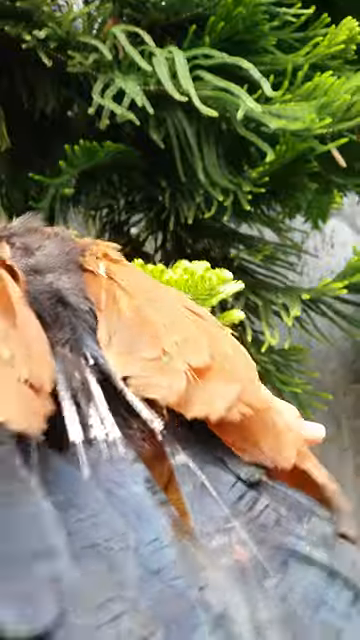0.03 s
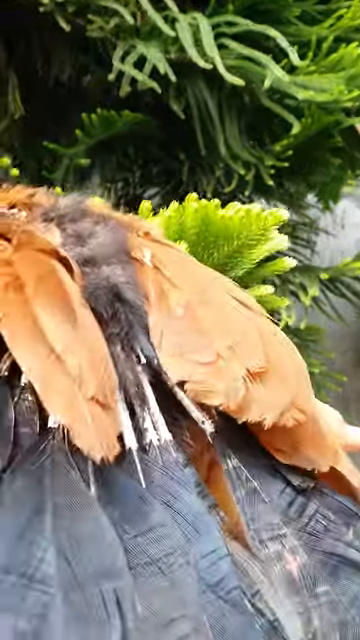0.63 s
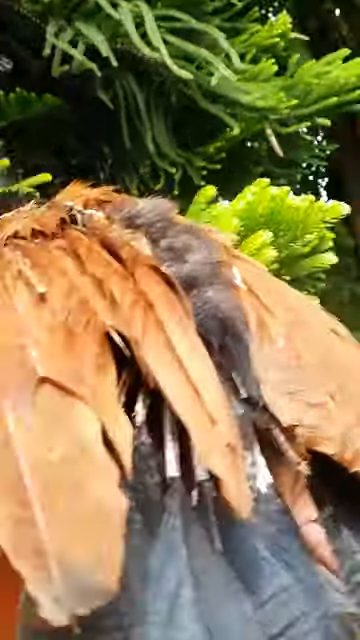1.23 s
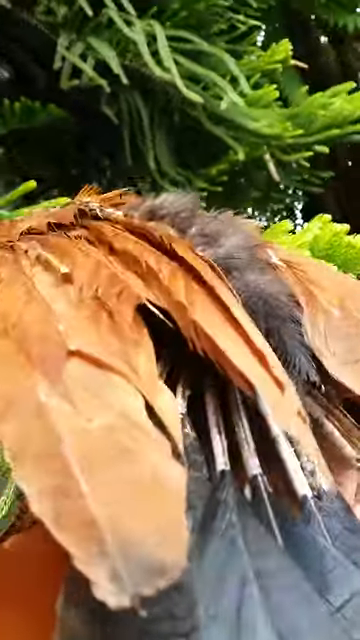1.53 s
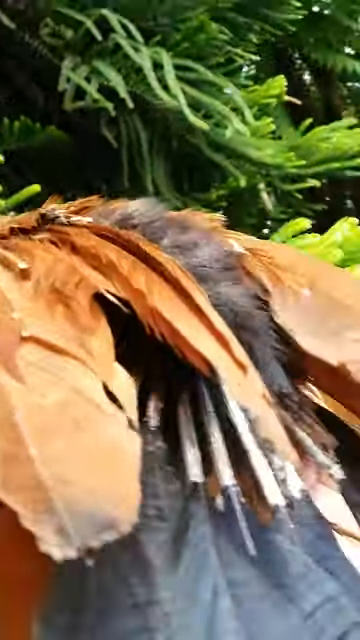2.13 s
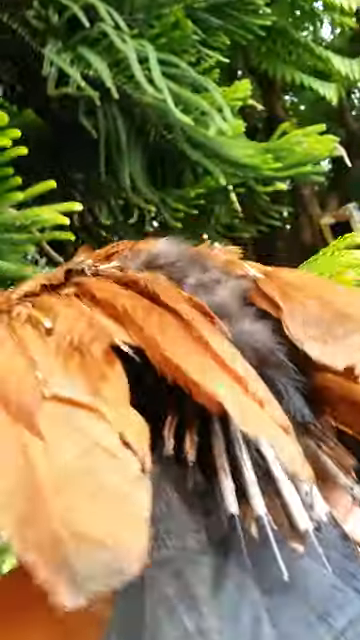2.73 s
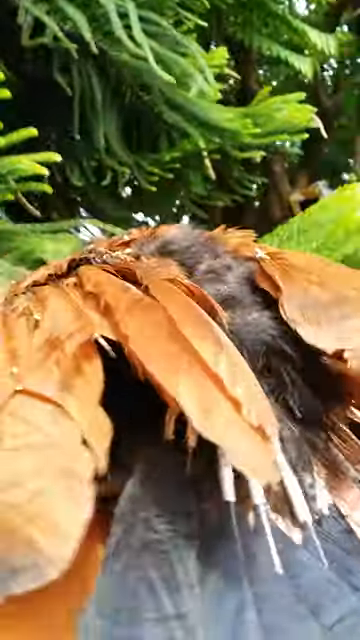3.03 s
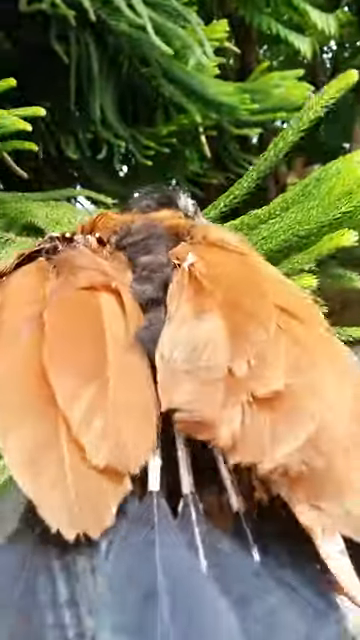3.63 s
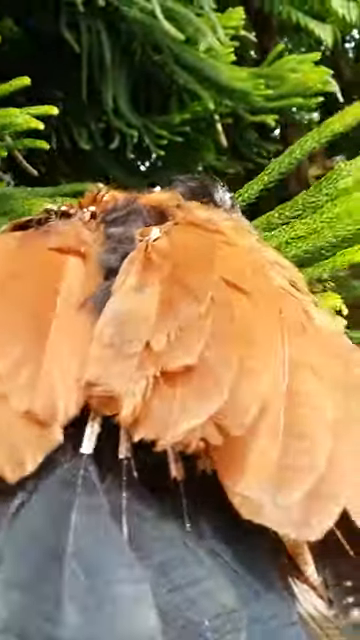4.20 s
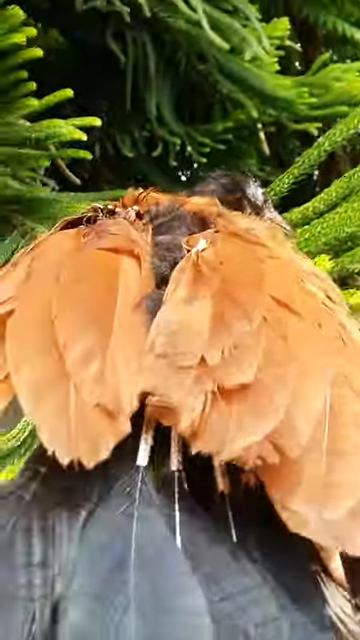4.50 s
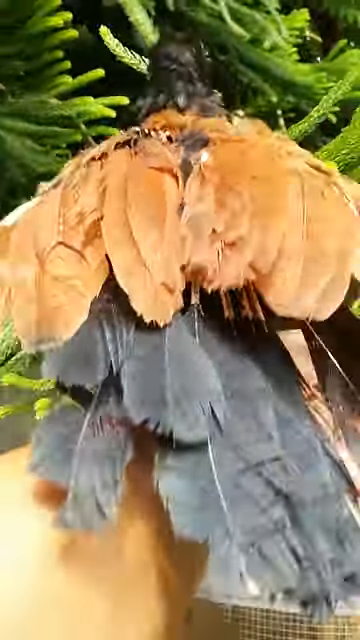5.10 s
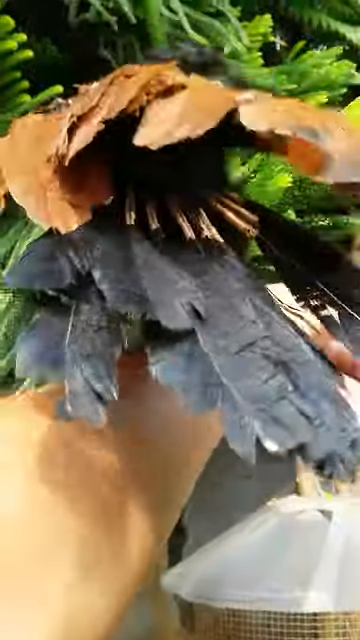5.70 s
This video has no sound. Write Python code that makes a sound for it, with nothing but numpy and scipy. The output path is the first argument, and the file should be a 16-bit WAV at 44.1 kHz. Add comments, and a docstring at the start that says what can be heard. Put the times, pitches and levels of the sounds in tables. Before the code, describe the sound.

Faint feather rustling and distant birds over a low outdoor rumble, until a bird close by squawks twice, loud and raspy.

```python
"""A tame bird handled in a garden.

Friction between its feathers makes a rustle; then it gives two loud, harsh squawks close by. By the
source-filter principle, the two sides of its syrinx pulse at different pitches and break into a rasp
where they collide, and throat and beak shape the spectrum. Small birds call far off over a low
outdoor rumble, and reflections in the yard add a short echo."""
import sys
import numpy as np
from scipy import signal
from scipy.fft import rfft, irfft
from scipy.io import wavfile
from scipy.ndimage import uniform_filter1d, minimum_filter1d

SR = 44100
rng = np.random.default_rng(int(sys.argv[2]) if len(sys.argv) > 2 else 0)


def output_pcm(signal):
    """Save a mono or channel-first signal as 16-bit PCM at the path in sys.argv[1].

    Samples are clipped to [-1, 1] before scaling.
    """
    pcm = np.clip(np.atleast_2d(signal).T, -1, 1) * 32767
    wavfile.write(sys.argv[1], SR, np.round(pcm).astype(np.int16))


N = 253575
T = np.arange(N) / SR

# Spectra of the noises: f/Hz, relative level/dB
RUMBLE_SPECTRUM = [(28, -45), (42, -12.5), (62, -6), (150, -0.5), (200, -6), (320, -9), (500, -16),
                   (750, -21.5), (1600, -24.5), (2150, -25.5), (3500, -42.5), (4800, -39.5), (6000, -49.5),
                   (11000, -47)]
KNOCK_SPECTRUM = [(300, -14), (700, -11), (1100, -3), (1500, -6), (2500, -30), (8000, -42)]
FEATHER_SPECTRUM = [(400, 5.5), (900, 1.5), (1500, 3.5), (2250, 1), (3000, -2), (3800, -9), (4900, 3),
                    (5500, -9), (6300, -19), (8000, -16), (11000, -15.5), (16000, -20)]
WING_SPECTRUM = [(470, -44), (800, -6), (1280, -3), (1460, -2), (2040, 3), (2990, -4.5), (3250, -12),
                 (3530, 0), (3660, -26), (3800, -5), (4880, 5.5), (6200, -20.5), (14000, -32)]
QUILL_SPECTRUM = [(400, 5), (1100, 7.5), (2300, 12), (3500, -8), (5000, 2), (7000, -28), (16000, -41)]
TICK_SPECTRUM = [(3000, -33), (7000, -25.5), (10800, 3), (13000, -24), (16000, -20)]
# Spells of a faint whine: t/s, length/s, level/dB, T60/s
WHINE_SPELLS = [(.5, 1.97, -71.5, 6.5), (3.931, .55, -65, 6)]
# Distant calls: t/s, length/s, start f/Hz, end f/Hz, relative level/dB, warble as a fraction of f
FAR_CALLS = [(0.086, 0.054, 5400, 4880, -77.5, 0.041), (0.193, 0.037, 5100, 5170, -71.5, 0.038),
             (0.42, 0.12, 1960, 1950, -70, .004), (.72, 0.088, 1870, 1775, -67.5, 0.023),
             (0.824, 0.21, 1973, 2004, -66, 0.02), (1.015, 0.11, 2095, 2180, -70, 0.011),
             (1.967, 0.045, 2440, 2380, -55.5, 0.052), (3.023, 0.057, 2300, 2390, -68.5, 0.06),
             (3.08, 0.22, 977, 986, -76.5, 0.0083), (3.341, 0.058, 3100, 3030, -79, 0.028),
             (3.364, 0.11, 1024, 1045, -73, .012), (3.566, 0.12, 1425, 1400, -78, .012),
             (4.373, 0.14, 1858, 1805, -64.5, 0.026)]
# Feathers sliding over each other: t/s, length/s, level/dB, T60/s
FEATHER_STROKES = [(0.745, .12, -63.5, 1.3), (0.863, 0.12, -62.5, 0.68), (1.276, .025, -69.5, .3),
                   (1.318, 0.081, -58.5, 0.94), (1.63, 0.047, -60.5, 0.45), (1.79, 0.15, -61.5, 1.3),
                   (1.957, 0.054, -55, 0.28), (2.079, 0.018, -55.5, 0.22), (2.114, 0.024, -58.5, 0.52)]
# Quills flicking: t/s, level/dB
QUILL_FLICKS = [(1.685, -51.5), (1.886, -55.5), (2.096, -73), (2.165, -47.5), (2.55, -53.5)]
# Thin, high squeaks: t/s, length/s, start f/Hz, end f/Hz, level/dB
HIGH_SQUEAKS = [(1.51, .115, 8500, 8490, -77), (1.516, 0.21, 10740, 10340, -78.5),
                (1.69, 0.034, 10450, 11100, -69.5), (1.73, .045, 11100, 11750, -70),
                (1.772, 0.078, 9900, 10450, -72.5), (1.836, .045, 11100, 10700, -74)]
# Tiny dry ticks: t/s, relative level/dB
DRY_TICKS = [(2.4444, -52), (4.202, -55), (4.263, -44), (4.3308, -49), (4.357, -48.5), (4.5122, -46.5)]
# Squawks: start t/s, catch t/s, break t/s, end t/s, time to crest/s, crest level/dB, end level/dB,
# high side f/Hz, its fall/(Hz/s), low side f/Hz, initial treble share/dB, low side weight at the
# catch/dB, rasp weight at the break/dB, rasp weight at the end/dB, time to part the beak/s
SQUAWK_CALLS = [(4.567, 4.611, 4.707, 4.905, 0.21, -18, -38, 823.5, 261.3, 701, -6.5, -10, 11, -12, 0.17),
                (4.914, 4.942, 5.287, 5.475, 0.21, -14, -24.5, 861.3, 34.46, 710.9, -4.5, -17.5, -8, -3.5, 0.011)]
# Vocal tract responses to the high side, the low side and the rasp: f/Hz, gain/dB
HIGH_TRACT = [(450, -35), (640, -21.5), (830, 3.5), (1000, 0.5), (1300, -42), (1600, -9), (1715, 4.5),
              (2450, 1), (2600, -13.5), (3050, -4), (3400, -19.5), (4250, -2.5), (5100, -14), (6200, -18),
              (8000, -25.5), (10300, -30), (13500, -44)]
LOW_TRACT = [(450, -28.5), (620, -8.5), (1000, -12), (1380, 0), (1750, -10), (2120, 9), (2400, 2),
             (2850, -16.5), (3500, -1.5), (4200, -8.5), (4900, -12), (6500, -42), (10000, -33.5),
             (16000, -45)]
RASP_TRACT = [(240, -95), (400, -10.5), (562, -1), (697, -19), (949, 0), (1250, -9), (1400, -8),
              (1530, -16), (2120, 5), (3070, -19.5), (3420, -10.5), (4880, -8.5), (8500, -30.5),
              (10200, -26.5), (16000, -48)]
# Further colouring by the taut and by the slack throat: f/Hz, gain/dB
TAUT_THROAT = [(650, -3), (850, 2.5), (1100, 3), (1650, 0), (2150, -1.5), (2430, -4), (2650, 0), (3300, 2),
               (4200, 1), (6200, -1.5), (9000, 0.5)]
SLACK_THROAT = [(520, -5), (630, 4.5), (850, 3.5), (1350, 1), (2100, -2), (2600, 3.5), (3400, -7.5),
                (4500, 4), (6500, 2), (10000, -2.5)]
# Reflections from near surfaces: delay/s, gain/dB
REFLECTIONS = [(.0043, -12), (.0091, -30.5), (.0168, -13), (.027, -10), (.041, -12.5)]
# Reverberation time of the yard: f/Hz, T60/s
YARD_T60 = [(300, 0.39), (1000, 0.38), (2200, 0.45), (4500, 0.36), (8000, 0.38), (15000, 0.34)]

BAND_LIMIT_HZ = 15900
BREAK_S = .0024  # how quickly the clear cry breaks up


def amp(db):
    """Amplitude ratio of a level in decibels."""
    return 10 ** (np.asarray(db) / 20)


def unit_rms(x):
    """Normalisation to an rms of 1."""
    return x / np.sqrt(np.mean(x ** 2) + 1e-20)


def value_at(points, hz):
    """Interpolation on a logarithmic frequency axis."""
    f, value = np.transpose(points)
    return np.interp(np.log(hz + 1), np.log(f + 1), value)


def colour(x, points):
    """Minimum-phase filtering: the phase follows from the log gain by the Hilbert transform."""
    log_gain = np.log(amp(value_at(points, abs(np.fft.fftfreq(4096, 1 / SR)))))
    taps = np.fft.ifft(np.exp(np.conj(signal.hilbert(log_gain)))).real
    return signal.oaconvolve(x, taps[:len(taps) // 2])[:len(x)]


def highpass(x, hz, order):
    """Zero-phase high-pass: the phase shifts of a forward and a backward pass cancel."""
    return signal.sosfiltfilt(signal.butter(order, hz, "high", fs=SR, output="sos"), x)


def noise(spectrum):
    """Spectral shaping of white noise, at rms 1."""
    return unit_rms(colour(rng.standard_normal(N), spectrum))


def wander(size, rate_hz):
    """Random fluctuation: low-passed noise with an rms near 1."""
    f = np.fft.rfftfreq(N, 1 / SR)
    spectrum = rfft(rng.standard_normal(N)) / np.sqrt(1 + (f / rate_hz) ** 8)
    return unit_rms(irfft(spectrum, N))[:size]


def sine(hz):
    """A tone of rms 1 whose phase is the integral of its frequency."""
    return unit_rms(np.sin(2 * np.pi * np.cumsum(hz) / SR))


def step(t, at, width):
    """A smooth transition from 0 to 1, centred on the given time."""
    return .5 + .5 * np.tanh((t - at) / (2 * width))


def fade(t, rise, fall):
    """A trapezoidal window over the span of t."""
    return np.clip((t - t[0]) / rise, 0, 1) * np.clip((t[-1] - t) / fall, 0, 1)


def envelope(start, length, db, t60, rise):
    """Linear rise and hold within the length, then exponential decay."""
    return np.clip((T - start) / rise, 0, 1) * amp(db - 60 * np.maximum(T - start - length, 0) / t60)


def add(mix, start, sound):
    """Superposition of a sound on the mix from the given time."""
    part = mix[max(round(start * SR), 0):][:len(sound)]
    part += sound[:len(part)]


def outdoors():
    """Low noise rumbles; random frequency modulation blurs a hum and two faint whines."""
    rumble = amp(-57.5 + .5 * wander(N, 3)) * noise(RUMBLE_SPECTRUM)
    hum = amp(-68.5 + 1.5 * wander(N, 7.6)) * sine(157.7 * (1 + .045 * wander(N, 11.89)))
    flicker = unit_rms(1 + .3 * wander(N, 40))
    spells = sum(envelope(*row, rise=.46) for row in WHINE_SPELLS)
    whine = spells * flicker * sine(2044 * (1 + .014 * wander(N, 140)))
    thin_whine = amp(-94) * sine(15000 * (1 + .001 * wander(N, 60)))
    return rumble + hum + whine + thin_whine


def small_birds():
    """Gliding whistles, made hoarse by the sidebands of random frequency and amplitude modulation."""
    calls, warbling = np.zeros(N), wander(N, 230)
    for start, length, start_hz, end_hz, db, warble in FAR_CALLS:
        inside = (T >= start) & (T < start + length)
        hz = np.linspace(start_hz, end_hz, inside.sum()) * (1 + warble * warbling[inside])
        flicker = unit_rms(1 + .33 * wander(len(hz), 100))
        add(calls, start, amp(db) * sine(hz) * flicker * signal.windows.tukey(len(hz), .5))
    return calls


def knock():
    """A damped impact: a dull bump as the bird is shifted in the hand."""
    return noise(KNOCK_SPECTRUM) * envelope(start=.332, length=.019, db=-60, t60=.16, rise=.008)


def feathers():
    """Stick-slip friction of the barbs makes a dense crackle; now and then a quill flicks."""
    grains = rng.standard_normal(N) * amp(2 * wander(N, 420))
    power = sum(envelope(start, length, db, t60, rise=.54 * length) ** 2
                for start, length, db, t60 in FEATHER_STROKES)
    slide = unit_rms(colour(grains, FEATHER_SPECTRUM)) * np.sqrt(power)
    flicks = sum(amp(db) * np.exp(-abs(T - at) / .0077) for at, db in QUILL_FLICKS)
    return slide + flicks * noise(QUILL_SPECTRUM)


def squeak(length, start_hz, end_hz, db):
    """A thin gliding tone, made unsteady by random modulation of frequency and level."""
    t = np.arange(0, length, 1 / SR)
    tone = sine(np.linspace(start_hz, end_hz, len(t)) * (1 + .0174 * wander(len(t), 340)))
    return amp(db + 2.8 * wander(len(t), 60)) * tone * fade(t, rise=.0089, fall=.017)


def wing():
    """Long feathers sweep past each other; interference with a close reflection comb-filters the hiss."""
    hiss = colour(rng.standard_normal(N) * amp(1.1 * wander(N, 330)), WING_SPECTRUM)
    reflection = .21 * np.interp(T - .00232, T, hiss)
    sweep = envelope(start=2.397, length=.1, db=-53.5, t60=.83, rise=.059)
    return unit_rms(hiss + reflection) * sweep


def ticks():
    """Transients: millisecond bursts of treble noise are heard as dry snaps."""
    snaps = sum(amp(db - 7.5) * np.exp(-abs(T - at - .001) / .00086) for at, db in DRY_TICKS)
    return snaps * noise(TICK_SPECTRUM)


def syrinx_pitches(age, since_catch, slack, high_hz, fall_hz_per_s, low_hz):
    """Tension sets pitch: both sides sag as they slacken, and the low side drops as the air is spent."""
    overshoot = .16 * (1 - step(since_catch, at=.011, width=.0019))  # the high side catches sharp
    high = high_hz * (1 + overshoot) - fall_hz_per_s * since_catch - 55.28 * slack
    low = low_hz - 24.02 * slack - 98.1 * step(age, at=.487, width=.015)
    waver = 1 + .0042 * wander(len(age), 30.4)
    return high * waver, low


def syrinx_weights(t, catch, crack, end, yelp, clear_low_db, break_rasp_db, end_rasp_db):
    """Three regimes of oscillation (low opening, clear cry, rasp) divide unit power among the sources."""
    opening = 1 - step(t, catch - .011, width=.0022)
    broken = step(t, crack, BREAK_S)
    clear = 1 - np.maximum(opening, broken)
    clearing = clear * amp(-130 * np.maximum(t - catch, 0))  # low side and rasp fade under the cry
    high = clear + broken * amp(2 - 107 * np.maximum(t - crack, 0))
    low = opening + clearing * amp(clear_low_db) + broken
    final_rasp = broken * np.interp(t, [crack, end], amp([break_rasp_db, end_rasp_db]))
    rasp = opening * amp(-4.5) + yelp * amp(1.5) + clearing * amp(-6) + final_rasp
    total = np.sqrt(high ** 2 + low ** 2 + rasp ** 2)
    return high / total, low / total, rasp / total


def membrane(hz, jitter, shimmer, rate_hz, harmonics):
    """One side of the syrinx: a harmonic series sums to uneven pulses. Also gives the phase in cycles."""
    cycles = np.cumsum(hz * (1 + jitter * wander(len(hz), rate_hz))) / SR
    pulses = sum(np.cos(2 * np.pi * k * cycles) * (k * hz < BAND_LIMIT_HZ)
                 for k in range(1, harmonics + 1))
    return pulses * (1 + shimmer * wander(len(hz), rate_hz)), cycles


def syrinx_and_tract(high_hz, low_hz, high, low, rasp):
    """Source and filter: two pulse trains and turbulent puffs of air excite the tract's resonances."""
    # the high side's pulses stumble as the rasp grows
    high_pulses, cycles = membrane(high_hz, jitter=.0058 + .008 * rasp, shimmer=.1 + .25 * rasp,
                                   rate_hz=150, harmonics=15)
    low_pulses, _ = membrane(low_hz, jitter=.0092, shimmer=.25, rate_hz=170, harmonics=26)
    airflow = .4 + np.exp(-(cycles % 1) / .3)  # air bursts through once a cycle
    puffs = rng.standard_normal(len(cycles)) * airflow * amp(1.4 * wander(len(cycles), 160))
    breath = colour(puffs, RASP_TRACT)
    hiss = amp(-29.5) * unit_rms(highpass(breath, 7400, order=4))
    high_tone = unit_rms(colour(high_pulses, HIGH_TRACT))
    low_tone = unit_rms(colour(low_pulses, LOW_TRACT))
    return high * (high_tone + hiss) + low * low_tone + rasp * unit_rms(breath)


def throat(voice, slack):
    """Little is radiated below the lowest resonance, which sinks as the throat slackens."""
    taut = colour(highpass(voice, 720, order=8), TAUT_THROAT)
    loose = colour(highpass(voice, 520, order=8), SLACK_THROAT)
    return (1 - slack) * taut + slack * loose + amp(-28) * voice


def beak(voice, treble_db, shut):
    """Radiation from an aperture: a wider beak lets out more treble; a shut one muffles the top."""
    treble = highpass(voice, 2370, order=3)
    share = amp(np.minimum(treble_db, -1))
    radiated = np.sqrt(1 - share ** 2) * unit_rms(voice - treble) + share * unit_rms(treble)
    return radiated + (amp(-3 * shut) - 1) * highpass(radiated, 5300, order=5)


def squawk(start, catch, crack, end, crest_after, crest_db, end_db, high_hz, fall_hz_per_s, low_hz,
           start_treble_db, clear_low_db, break_rasp_db, end_rasp_db, parting_s):
    """Flow-driven oscillation: the low side opens, the high side catches, rings clear, then breaks."""
    t = np.arange(start, end, 1 / SR)
    age, length = t - start, end - start
    # the catch is a loud, dull yelp; the break lets out a milder, longer burst
    yelp = np.exp(-((t - catch) / .015) ** 2)
    burst = step(t, crack, BREAK_S) * np.exp(-((t - crack) / .025) ** 2)
    swell_db = np.interp(age, [0, crest_after, length], [crest_db - 5, crest_db, end_db])
    attack_db = -17 * np.maximum(1 - age / .013, 0)
    tremble_db = 1.62 * wander(len(t), 43.6)
    effort_db = swell_db + attack_db + tremble_db + 3 * yelp + 2 * burst
    gape_db = np.interp(age / length, [0, .73, 1], [start_treble_db, -3, -11])
    slack = step(age, at=.345, width=.034)
    pitches = syrinx_pitches(age, t - catch, slack, high_hz, fall_hz_per_s, low_hz)
    weights = syrinx_weights(t, catch, crack, end, yelp, clear_low_db, break_rasp_db, end_rasp_db)
    voice = throat(syrinx_and_tract(*pitches, *weights), slack)
    cry = beak(voice, treble_db=gape_db - 6.5 * yelp - 4 * burst, shut=np.maximum(1 - age / parting_s, 0))
    return amp(effort_db) * cry * fade(t, rise=.003, fall=.012)


def near_echoes(x):
    """Specular reflection: each near surface returns one delayed, weaker copy."""
    echoes = np.zeros(N)
    for delay, db in REFLECTIONS:
        add(echoes, delay, amp(db) * x)
    return echoes


def yard(x, echoes_per_s=3000, build_up_s=.05):
    """Reverberation: walls and trees scatter the sound, and each band decays at its own rate."""
    taps = rng.choice([-1., 1.], SR) * (rng.random(SR) < echoes_per_s / SR)
    hz, t, bands = signal.stft(taps, SR, nperseg=256)
    decay = amp(-60 * t / value_at(YARD_T60, hz)[:, None])
    tail = signal.istft(bands * decay, SR, nperseg=256)[1]
    tail *= np.clip(np.arange(len(tail)) / SR / build_up_s, 0, 1)
    return signal.fftconvolve(x, tail / np.linalg.norm(tail))[:N]


def scene():
    """Superposition in mono; the far birds have a lower direct-to-reverberant ratio than the near one."""
    squawks = np.zeros(N)
    handling = feathers() + wing() + ticks() + knock()
    for start, *shape in SQUAWK_CALLS:
        add(squawks, start, squawk(start, *shape))
    for start, *shape in HIGH_SQUEAKS:
        add(handling, start, squeak(*shape))
    near, far = squawks + handling, small_birds()
    reverberation = yard(amp(-7.5) * near + amp(-3.5) * far)
    return (near + near_echoes(squawks) + amp(2) * far + reverberation + outdoors())[None]


def record(dry, ceiling=.67):
    """Peak limiting: a smoothed gain holds down the loudest peaks; a low-pass then limits the band."""
    peak = -minimum_filter1d(-abs(dry[0]), size=400)
    gain = uniform_filter1d(np.minimum(1, ceiling / (peak + 1e-9)), size=300)
    lowpass = signal.firwin(511, BAND_LIMIT_HZ, window=("kaiser", 9), fs=SR)
    return signal.oaconvolve(dry * gain, lowpass[None], "same")


dry = scene()
out = record(dry)
output_pcm(out)
```